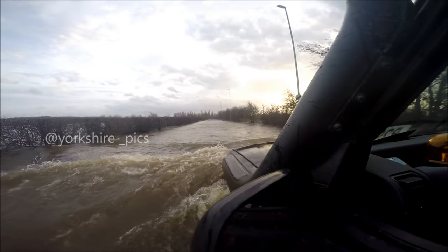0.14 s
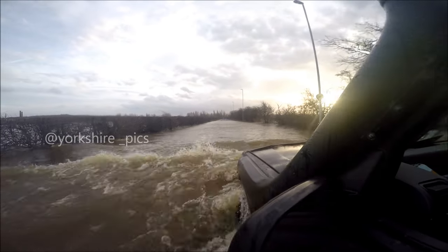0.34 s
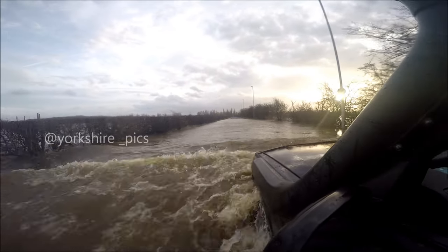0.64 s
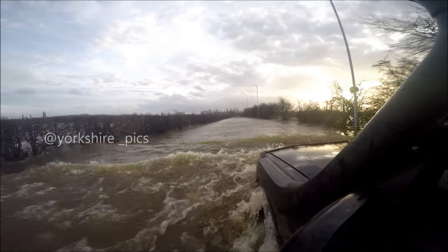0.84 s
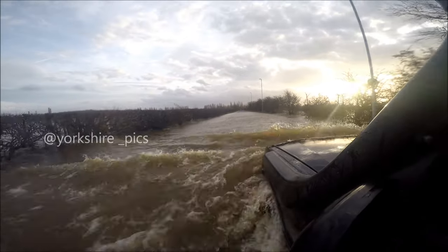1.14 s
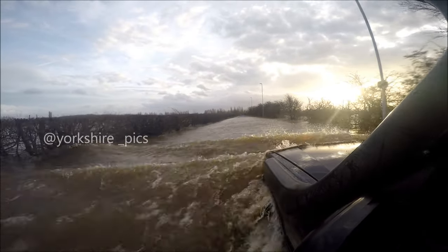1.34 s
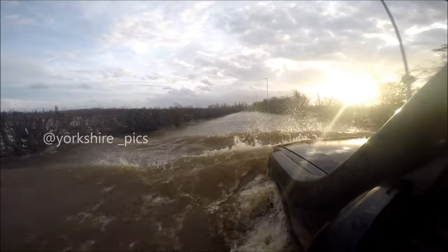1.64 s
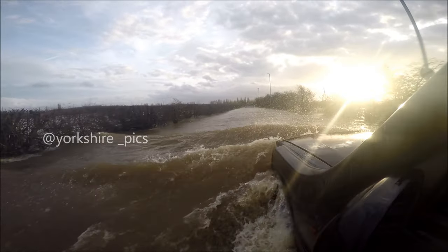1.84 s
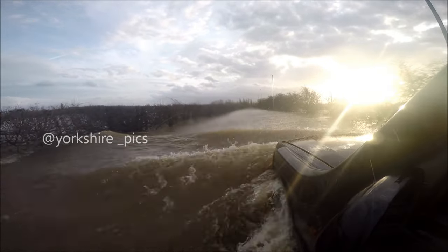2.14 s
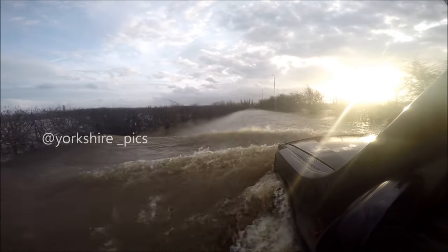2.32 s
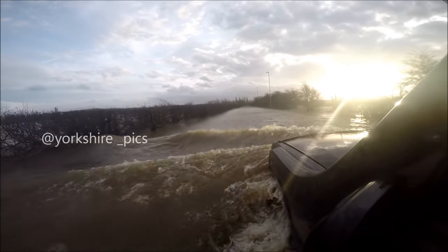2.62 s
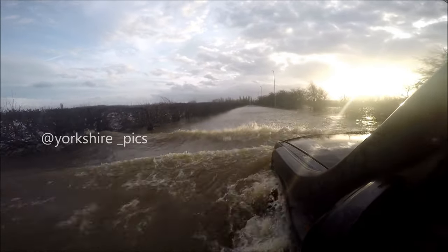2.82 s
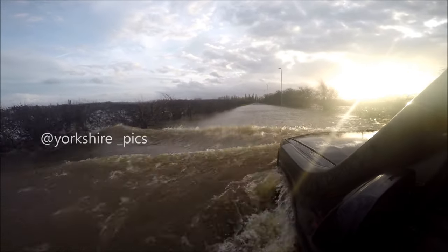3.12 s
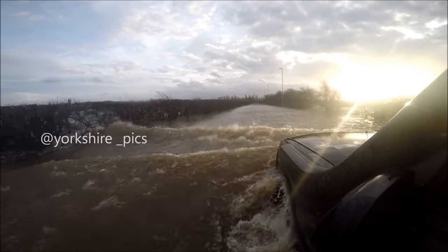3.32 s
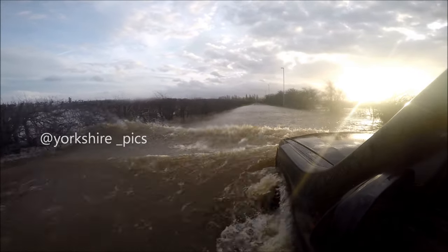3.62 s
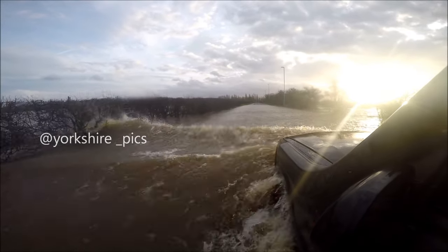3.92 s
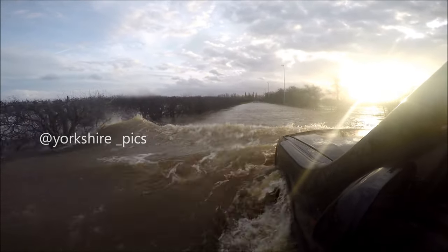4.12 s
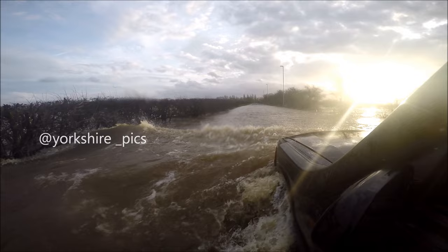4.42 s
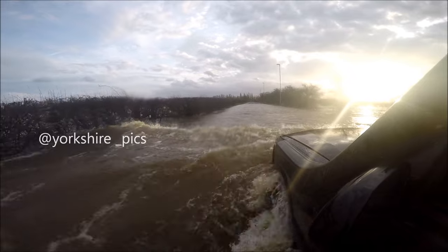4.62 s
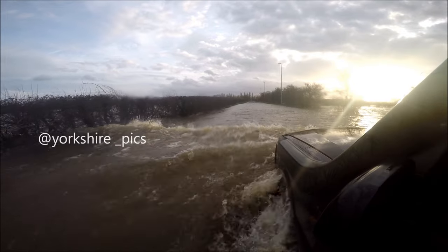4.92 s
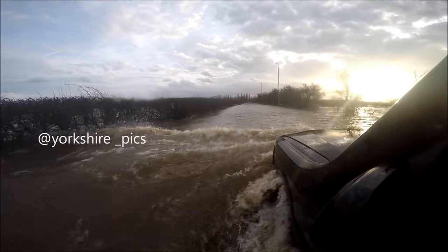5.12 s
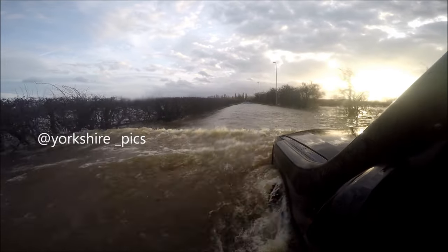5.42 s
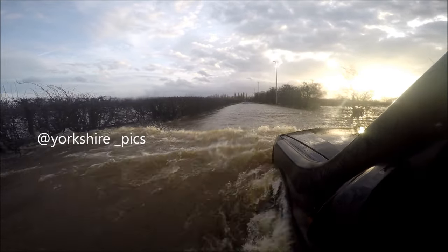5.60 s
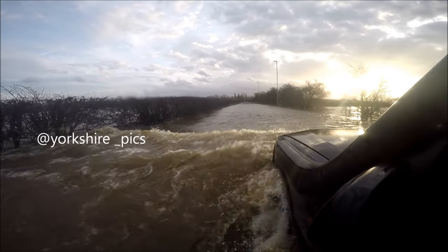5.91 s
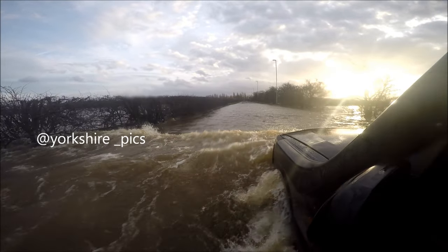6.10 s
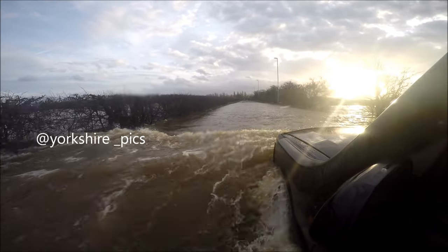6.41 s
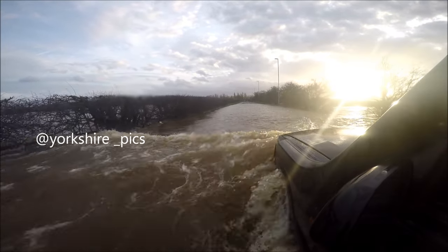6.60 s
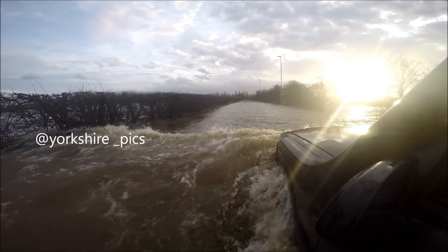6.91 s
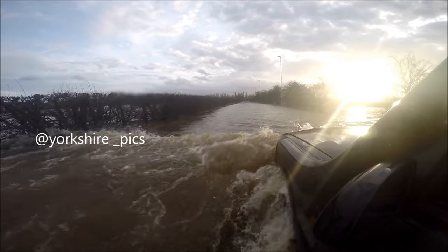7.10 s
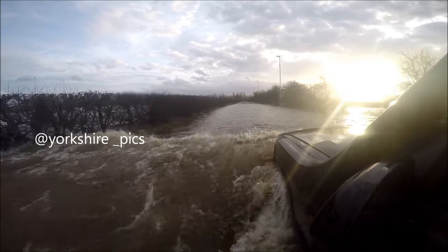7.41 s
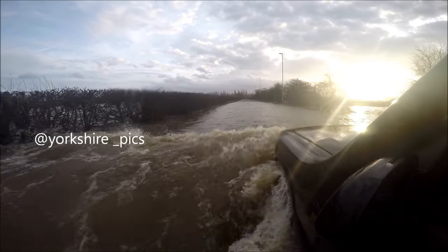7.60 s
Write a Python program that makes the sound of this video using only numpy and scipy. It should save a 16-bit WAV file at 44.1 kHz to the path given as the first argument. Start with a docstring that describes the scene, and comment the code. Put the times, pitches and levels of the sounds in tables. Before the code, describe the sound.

Wind thumps and tears at a small microphone outside a vehicle window while floodwater rushes past over a low, steady engine drone.

```python
"""A car ploughs through deep flood water: the bow wave rushes and fizzes, as noise bands plus ringing bubbles.
The engine drones in tones locked to its firing rate; water and engine rise and sink along one set level curve.
Wind buffets the port of a small cased microphone held out of the side window: low pressure thumps,
gusting rumble and rustle, and short bursts of tearing air. One water drop rings briefly."""
import sys
import numpy as np
from scipy import signal
from scipy.fft import rfft, irfft, next_fast_len
from scipy.io import wavfile

SR = 44100
rng = np.random.default_rng(int(sys.argv[2]) if len(sys.argv) > 2 else 0)


def unload_audio(sound):
    """Save the sound as a 16-bit wav file, at the path given as the first command line argument."""
    columns = np.transpose(np.atleast_2d(sound))
    # keep every value between -1 and 1, then stretch to whole-number steps
    steps = np.round(np.clip(columns, -1, 1) * 32767)
    wavfile.write(sys.argv[1], SR, steps.astype(np.int16))


N = 341775

# level curve shared by water and engine: (time [s], level [dB])
WASH_LEVEL = [(0, -32), (.15, -34.5), (.56, -32.5), (.76, -37), (.97, -40), (2.03, -40), (2.35, -45),
              (2.62, -44.5), (2.72, -46.5), (2.9, -47.5), (3.28, -43.5), (3.6, -41), (3.78, -43.5),
              (4.55, -36), (4.66, -35), (4.78, -45), (5.3, -45.5), (6.2, -37), (6.73, -34), (7.75, -33)]
# narrow and broad peaks colouring the water sound; the tearing air rings the first:
# (frequency [Hz], bandwidth [Hz], lift [dB])
COLOUR_PEAKS = [(742, 194, 5), (2380, 990, -0.5), (4360, 65, 9), (4670, 56, 6.5), (7540, 1270, 3.5),
                (9950, 1350, 6.5), (13200, 800, 4)]
# single pressure bumps, before the port: (time [s], peak level [dB], width at half height [ms], push +1 or pull -1)
PRESSURE_BUMPS = [(0.569,-4,10,1),(0.63,-9,4.9,1),(0.663,-2.5,10,-1),(0.721,0,8.5,1),(0.84,-6,5.4,1),(1.187,-1,5.8,1),(1.209,-3.5,6,1),(1.325,-3,5.7,1),(1.444,-7,5.6,1),(1.635,-1,4.8,1),(1.672,-6,8.1,1),(1.818,-4.5,10,1),(1.839,-5.5,4.6,1),(1.913,-1,11,-1),(2.05,-3.5,8.4,1),(2.103,-4.5,4.1,1),(2.109,-10,4.9,-1),(2.146,-8,5.3,-1),(2.237,-3.5,4.6,-1),(2.307,-2,3.3,1),(2.371,-3.5,5.7,1),(2.489,-12,4.7,1),(2.616,-8,8.2,1),(2.645,-6,3,1),(2.67,0,7.2,1),(2.681,-7,4.7,-1),(3.31,-3,5.4,1),(3.479,-5.5,4.3,-1),(3.594,-2.5,8.1,1),(3.612,-2,9,1),(3.635,-4,2.4,1),(3.676,-3,7.7,1),(3.716,-8,1.7,1),(4.208,-8,6,1),(4.253,-12,10,1),(4.589,-9,6.2,-1),(4.674,0,3.6,1),(4.687,-9,1.4,1),(4.693,5,1.24,-1),(4.708,-13,4.4,1),(4.715,1,2.8,-1),(4.731,-3.5,3.1,1),(4.783,0.5,3.1,1),(4.871,-9,4.9,-1),(5.087,-4,7.4,1),(5.254,-0.5,7.2,1),(5.61,-2,5.3,-1),(5.768,-5,13,1),(5.81,-9,3.3,1),(6.048,-7,4,1),(6.407,-4.5,8.6,1),(6.842,-7,6.6,-1),(7.412,-6,7.6,-1),(7.651,-9,4.4,1)]


def from_db(db):
    """Level to amplitude: 20 dB is a factor of ten."""
    return 10 ** (np.asarray(db) / 20)


def rms_one(x):
    """Normalisation of the mean power to one."""
    return x / np.sqrt(np.mean(x ** 2) + 1e-20)


def in_time(rows):
    """Linear interpolation of a curve table in time: one array per column, one value a sample."""
    times, *columns = np.transpose(rows)
    return [np.interp(np.arange(N) / SR, times, column) for column in columns]


def drift(rate_hz):
    """Slow random modulation: noise through a critically damped two-pole low-pass, standard deviation 1."""
    step = 40  # samples between drawn values
    pole = np.exp(-2 * np.pi * rate_hz * step / SR)
    white = rng.standard_normal(N // step + 2002)
    slow = signal.lfilter([1], [1, -2 * pole, pole * pole], white)[2000:]  # without the settling
    return np.interp(np.arange(N) / step, np.arange(len(slow)), rms_one(slow))


def band(x, low_hz, high_hz, order=2):
    """Band limitation by a Butterworth filter, maximally flat in the passband."""
    return signal.sosfilt(signal.butter(order, [low_hz, high_hz], "band", fs=SR, output="sos"), x)


def resonance(x, hz, width_hz):
    """Damped oscillator: a pole pair whose radius sets the bandwidth, with a peak gain of about 1."""
    r = np.exp(-np.pi * width_hz / SR)
    numerator = np.array([1, 0, -1]) * (1 - r * r) / 2
    return signal.lfilter(numerator, [1, -2 * r * np.cos(2 * np.pi * hz / SR), r * r], x)


def colour(x, spectrum):
    """Spectral shaping by a gain curve that is linear in dB over log frequency."""
    size = next_fast_len(N)
    hz = np.maximum(np.arange(size // 2 + 1) * SR / size, 10)
    points_hz, points_db = np.array(spectrum).T
    gain = from_db(np.interp(np.log(hz), np.log(points_hz), points_db))
    return irfft(rfft(x, size) * gain, size)[:N]


def gusts():
    """Amplitude modulation by wind: gusts swell and fade linearly in dB, above a lull whose rumble is steady
    and whose rustle rises and sinks with the water."""
    # (time [s], rumble level [dB], rustle level [dB], length within 10 dB of the peak [s], at least 0.01)
    gust_rows = [(0.303, -20, -37, 0.5), (0.569, -9, -26, 0), (0.653, -14, -34, 0),
                 (0.726, -11, -23.5, 0.02), (0.862, -16, -25, 0.08), (1.017, -14.5, -27.5, 0.22),
                 (1.174, -3, -11.5, 0.01), (1.312, -14, -28, -0.04), (1.42, -11.5, -28, 0.18),
                 (1.64, -12, -25.5, 0.04), (1.854, -9, -26, 0.16), (2.103, -11, -32, 0.07),
                 (2.224, -19, -30.5, 0.1), (2.284, -13, -19.5, 0.05), (2.373, -10, -37.5, .05),
                 (2.502, -6, -29.5, -0.04), (2.612, -7, -30, .06), (2.668, -3, -14, 0.0135),
                 (2.82, -15.5, -24, 0.01), (2.968, -14, -42, 0.1), (3.306, -13, -35, 0.17),
                 (3.412, -8, -39, 0.03), (3.485, -0.5, -28, 0.01), (3.606, -2.5, -13, -0.07),
                 (3.711, -7, -33, -0.02), (3.916, -30, -45, 0.3), (4.216, -12.5, -24, 0.17),
                 (4.554, -15, -22, .08), (4.643, -12.5, -20.5, 0.04), (4.707, 3, -9.5, -0.01),
                 (4.85, -11.5, -25.5, 0.09), (5.072, -15, -34, 0.02), (5.268, -11, -28.5, .1),
                 (5.608, -8.5, -30, 0.08), (5.774, -10, -30, .09), (5.967, -14.5, -50, 0.2),
                 (6.073, -12, -45, 0.04), (6.383, -5, -28, 0.04), (6.524, -13, -29, .14),
                 (6.85, -13.5, -32, 0.26), (7.07, -15, -32, .2), (7.291, -12.5, -22.5, 0.13),
                 (7.421, -11, -16.5, -0.08), (7.549, -3, -17.5, 0), (7.636, -11, -27, 0),
                 (7.714, -16, -35, 0.17)]
    lull_rumble_db, lull_rustle_db = -30.5, 1  # the rustle is relative to the wash level
    t = np.arange(0, N, 32) / SR
    peak_s, rumble_db, rustle_db, length_s = np.transpose(gust_rows)[:, :, None]
    swell_db = -20 * np.abs(t - peak_s) / np.maximum(length_s, .01)

    def summed(peak_db):
        """Superposition of the gust amplitudes."""
        return np.interp(np.arange(N) / SR, t, from_db(peak_db + swell_db).sum(axis=0))

    rumble_gain = summed(rumble_db) + from_db(lull_rumble_db)
    rustle_gain = summed(rustle_db) + from_db(in_time(WASH_LEVEL)[0] + lull_rustle_db)
    return rumble_gain, rustle_gain


def turbulence():
    """Turbulent pressure noise in three bands under the gusts; rumble and flutter dip near each buffet."""
    rumble_gain, rustle_gain = gusts()
    rumble = rumble_gain * rms_one(band(rng.standard_normal(N), 12.8, 49.8))
    share = 0.56  # flutter follows the rumble by this share, the rustle by the rest
    flutter_gain = rumble_gain ** share * rustle_gain ** (1 - share) * from_db(-8.5 + 4.3 * drift(26))
    flutter = flutter_gain * rms_one(band(rng.standard_normal(N), 76, 176))
    rustle = rustle_gain * from_db(2.66 * drift(37.5)) * rms_one(band(rng.standard_normal(N), 120, 506))

    t = np.arange(N) / SR
    bump_s = np.array(PRESSURE_BUMPS)[:, 0]
    after = np.clip(np.searchsorted(bump_s, t), 1, len(bump_s) - 1)
    nearest_s = np.minimum(np.abs(t - bump_s[after]), np.abs(t - bump_s[after - 1]))
    dip = 1 - 0.68 * np.exp(-(nearest_s / 0.012) ** 2)
    return (rumble + flutter) * dip + rustle


def tears():
    """Air tearing across the port: dull noise bursts excite a damped resonance."""
    # bursts before filtering and gain: (start [s], envelope level [dB], decay length [ms], at least 2)
    burst_rows = [(0.658, -9.5, 27), (0.709, -8, 12), (1.34, -20, 6.1), (1.952, -15.5, 16),
                  (2.044, -12.5, 9.2), (2.096, -10, 24), (2.224, -14, 22), (2.278, -15, 10),
                  (2.3, -10.5, 9.9), (2.359, -14, 19), (2.483, -20, 14), (2.642, -9, 14), (2.664, -16, 14),
                  (2.791, -19, 16), (3.286, -18.5, 13), (3.589, -16, 17), (3.629, -20, 12),
                  (3.668, -17, 10), (3.709, -12.5, 7.4), (4.666, -6.5, 16), (4.687, -8, 17),
                  (4.701, -9.5, 12), (4.722, -12, 11), (4.778, -5.5, 7.8), (4.824, -18, 11),
                  (4.858, -17, 19), (5.082, -11.5, 13), (5.254, -13, 16), (5.896, -21, 12),
                  (5.965, -9.5, 8.5), (6.333, -11, 11)]
    gain_db = 8.5  # sensitivity of the port to tearing air
    t, envelope = np.arange(N) / SR, np.zeros(N)
    for start_s, level_db, length_ms in burst_rows:
        near = slice(round(start_s * SR), round((start_s + .08) * SR))
        age = 1000 * (t[near] - start_s) / max(length_ms, 2)  # in decay lengths
        envelope[near] += from_db(level_db) * np.minimum(6 * age, 1) * np.exp(-age ** 2)
    noise = band(envelope * rng.standard_normal(N) + 1e-18, 180, 810, order=3)
    peak_hz, peak_width_hz, _ = COLOUR_PEAKS[0]
    return from_db(gain_db) * (noise + 1.1 * resonance(noise, peak_hz, peak_width_hz))


def buffets():
    """Pressure equalisation: Gaussian bumps pass a leaky port, a second-order high-pass, and swing back."""
    port_hz, port_q, gain_db = 28, .7, 3.4  # corner, quality factor, sensitivity of the port to buffets
    t, pressure = np.arange(N) / SR, np.zeros(N)
    for centre_s, peak_db, width_ms, sign in PRESSURE_BUMPS:
        near = slice(round((centre_s - .05) * SR), round((centre_s + .05) * SR))
        half_widths = 2000 * (t[near] - centre_s) / width_ms
        pressure[near] += np.sign(sign) * from_db(peak_db) * .5 ** (half_widths ** 2)
    w = 2 * np.pi * port_hz
    b, a = signal.bilinear([1, 0, 0], [1, w / port_q, w * w], SR)
    return from_db(gain_db) * signal.lfilter(b, a, pressure + 1e-18)


def drops():
    """Damped free oscillation of a water drop: an exponential decay with rising pitch."""
    # (start [s], starting pitch [Hz], level from which the decay starts [dB], time to fall 60 dB [s])
    drop_rows = [(2.037, 2500, -16.5, 0.0097)]
    out = np.zeros(N)
    for start_s, hz, level_db, t60 in drop_rows:
        age = np.arange(round(t60 * SR)) / SR
        envelope = np.minimum(age / 0.0018, 1) * from_db(level_db - 60 * age / t60)
        start = round(start_s * SR)
        out[start:start + len(age)] += envelope * np.sin(2 * np.pi * hz * age * (1 + 3.2 * age))
    return out


def engine(turns):
    """Periodic excitation: sine tones at fixed multiples of the firing rate, each wavering a little."""
    # (multiple of the firing rate, rms level over the wash level [dB], waver [dB],
    #  extra level per dB of wash swing [dB/dB])
    tone_rows = [(1, 14.5, 1.5, .1), (2, 11.5, 1.5, .1), (3, -1, 1.5, .1), (4.251, -2.5, 2.0, .01),
                 (4.75, -0.5, 2.5, .01), (5, -1.5, 1.5, -.1), (5.999, -10.5, 3, .01), (7, 1.5, 2, -0.4)]
    wash_db = in_time(WASH_LEVEL)[0]
    swing_db = wash_db - wash_db.mean()
    out = np.zeros(N)
    for multiple, level_db, waver_db, share in tone_rows:
        gain = from_db(level_db + waver_db * drift(1.85) + share * swing_db)
        out += gain * np.sqrt(2) * np.sin(2 * np.pi * (multiple * turns + rng.random()))
    return out


def spray(shared_db, own_db):
    """Modulated broadband noise: half-octave bands surge together and flicker independently."""
    out, surge = 0, drift(20)
    edges_hz = 100 * 2 ** np.arange(0, 8, .5)
    white = rng.standard_normal((2, N))  # neighbouring bands draw on different noises
    for k, (low_hz, high_hz) in enumerate(zip(edges_hz, edges_hz[1:])):
        gain = from_db(shared_db * surge + own_db * drift(38))
        out = out + gain * band(white[k % 2], low_hz, high_hz)
    return rms_one(out)


def bubbles(per_s, cycles, spread_db):
    """Random impulses excite damped bubble resonances, weighted for a flat overall spectrum."""
    sizes = from_db(spread_db * np.minimum(rng.exponential(1, N), 4)) * rng.choice([-1, 1], N)
    born = rng.random(N) < per_s * from_db(1.5 * drift(15)) / SR
    pitches_hz, dealt = np.geomspace(300, 9000, 24), rng.integers(0, 24, N)
    out = np.zeros(N)
    for k, hz in enumerate(pitches_hz):
        impulses = sizes * born * (dealt == k) + 1e-18
        width_hz = 2.85 * hz / cycles  # falls by about 78 dB in the given cycles
        out += np.sqrt(hz) * rms_one(resonance(impulses, hz, width_hz))
    return rms_one(out)


def water(turns):
    """Source and filter: spray and bubbles, throbbing slightly with each firing, take a fixed spectral colour."""
    # relative spectrum of rushing water as coloured by the case: (frequency [Hz], density per Hz [dB])
    rush_spectrum = [(90, -10.5), (300, -12.5), (600, -5.5), (790, -5), (1110, -13.5), (1600, -19.5),
                     (1950, -26.5), (2450, -24.5), (3340, -38.5), (4250, -34), (4500, -30), (5600, -26),
                     (8800, -45), (15300, -47)]
    level_db, bubbles_db, throb_depth = 16.5, -8, 0.037  # over the wash level, over the spray, share
    flat = spray(shared_db=0.45, own_db=0.8)
    flat = flat + from_db(bubbles_db) * bubbles(per_s=2500, cycles=8.7, spread_db=2.0)
    flat = flat * (1 + throb_depth * np.cos(2 * np.pi * turns))
    for hz, width_hz, lift_db in COLOUR_PEAKS:
        flat = flat + (from_db(lift_db) - 1) * resonance(flat, hz, width_hz)
    return from_db(level_db) * rms_one(colour(flat, rush_spectrum))


def scene():
    """Superposition of water and engine, on their common level curve, with the wind and the drop."""
    # engine: (time [s], firing rate [1/s])
    firing_rate = [(0, 71.4), (.6, 71.2), (1.25, 69.9), (2, 67.9), (2.75, 66.2), (3.75, 65.9), (4.5, 66.8),
                   (5.25, 68.5), (6, 70.3), (6.5, 70.7), (7.75, 70.9)]
    turns = np.cumsum(in_time(firing_rate)[0]) / SR  # phase in firings
    wash = from_db(in_time(WASH_LEVEL)[0]) * (water(turns) + engine(turns))
    return (wash + turbulence() + buffets() + tears() + drops())[None]


def record(dry):
    """Soft saturation rounds the peaks; a steep elliptic low-pass limits the bandwidth."""
    cutoff_hz = 15280
    rounded = dry / (1 + np.abs(dry / .98) ** 3) ** (1 / 3)
    return signal.sosfilt(signal.ellip(16, .5, 90, cutoff_hz, fs=SR, output="sos"), rounded)


dry = scene()
out = record(dry)
unload_audio(out)
```